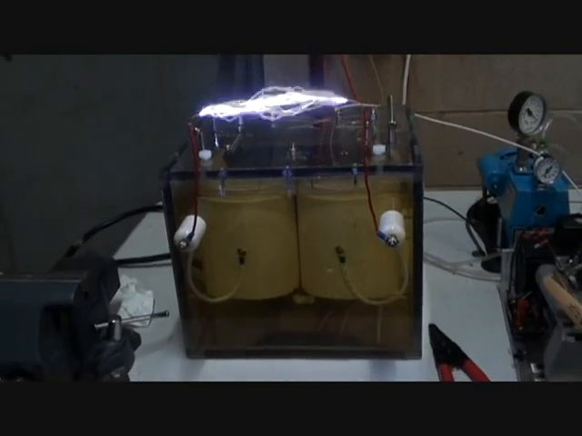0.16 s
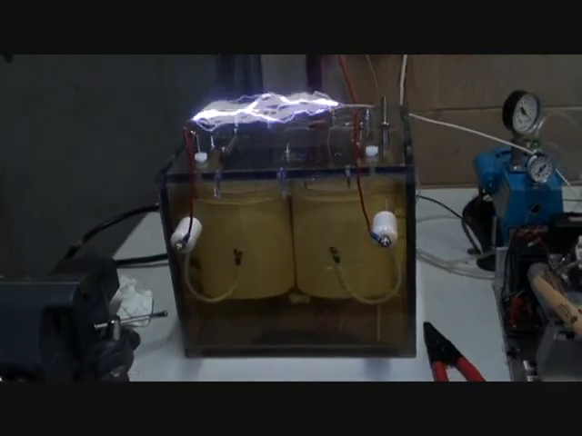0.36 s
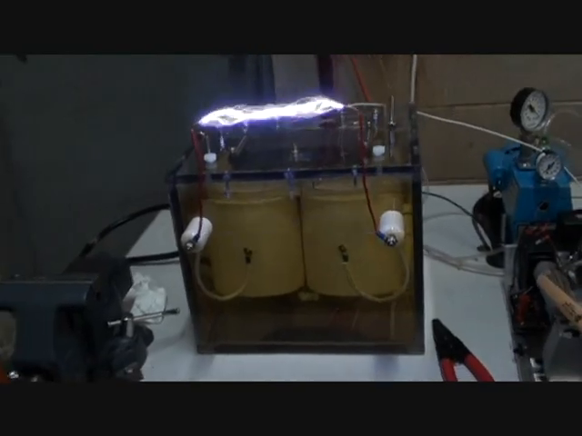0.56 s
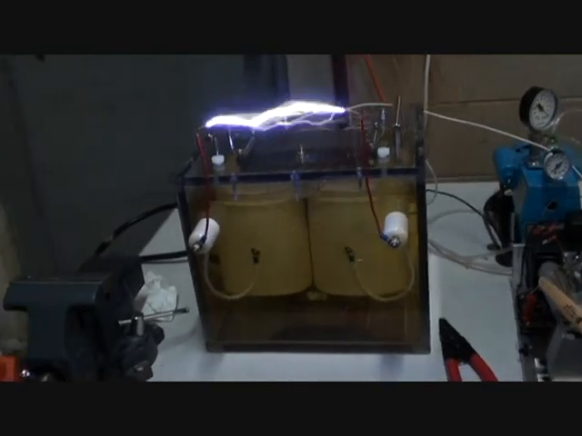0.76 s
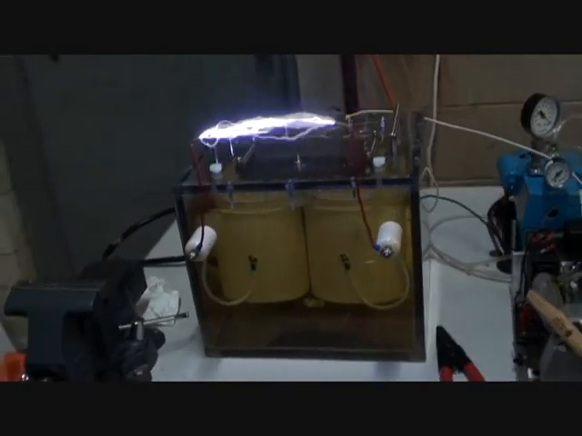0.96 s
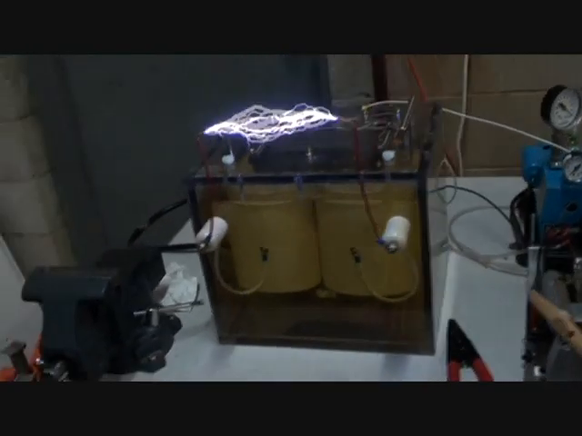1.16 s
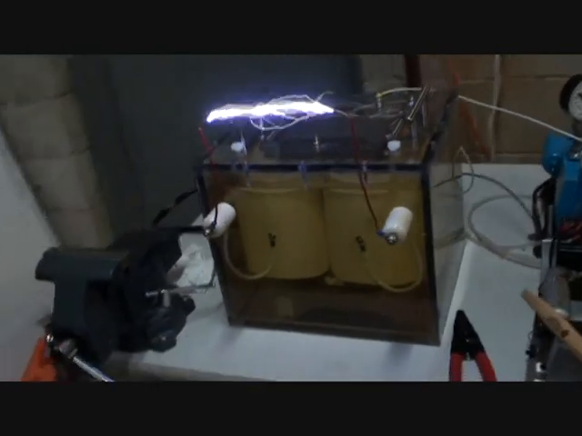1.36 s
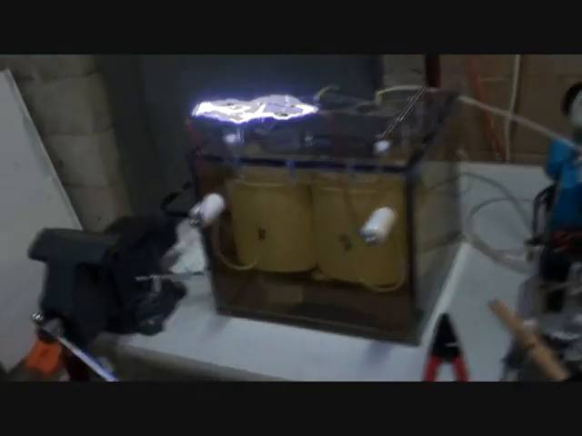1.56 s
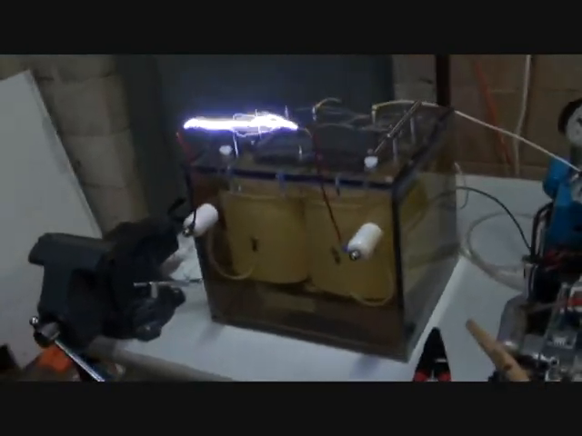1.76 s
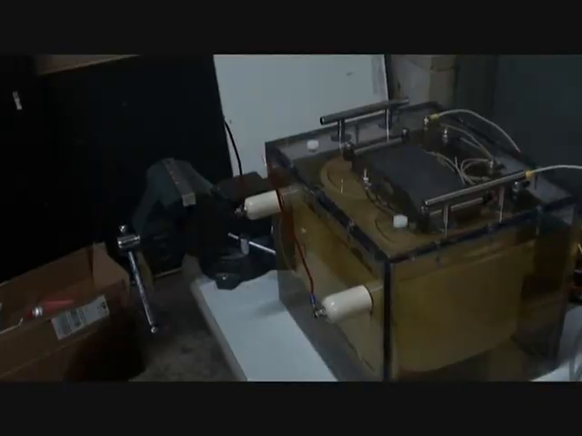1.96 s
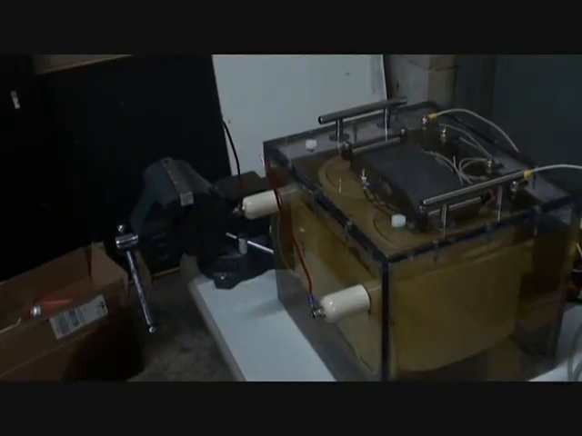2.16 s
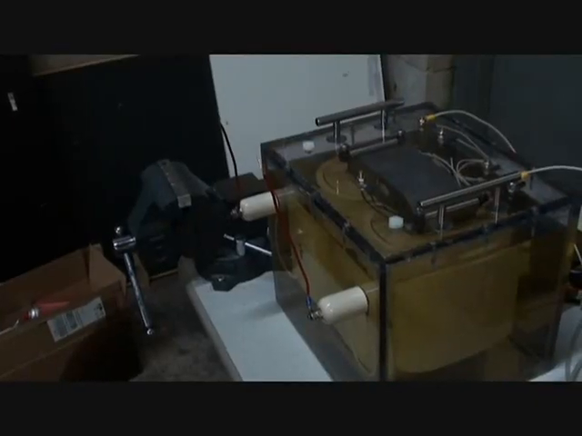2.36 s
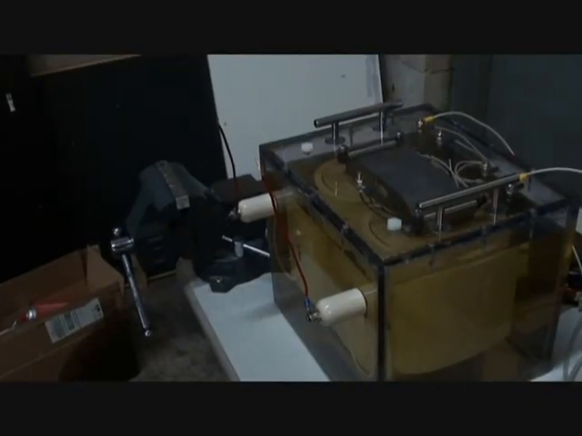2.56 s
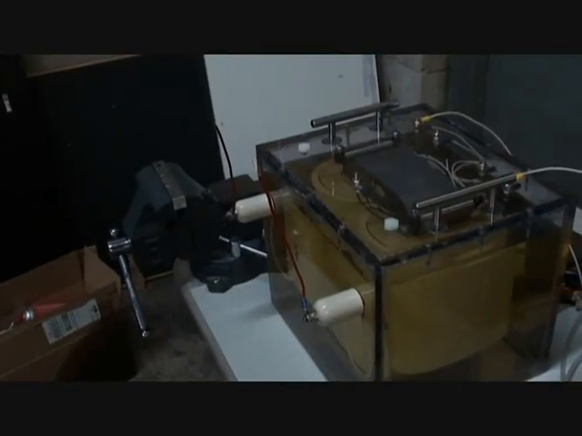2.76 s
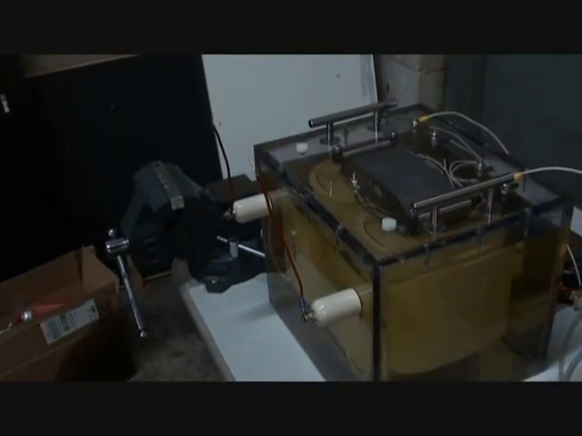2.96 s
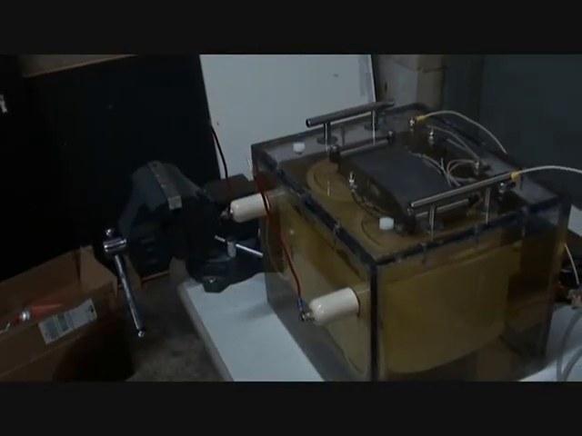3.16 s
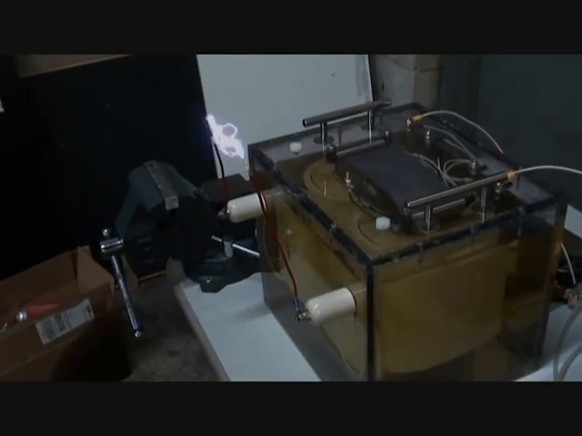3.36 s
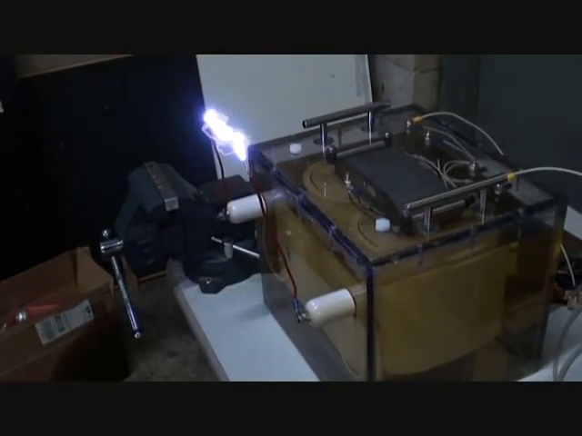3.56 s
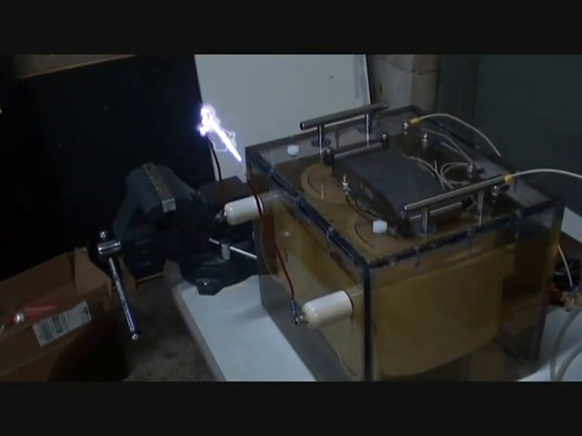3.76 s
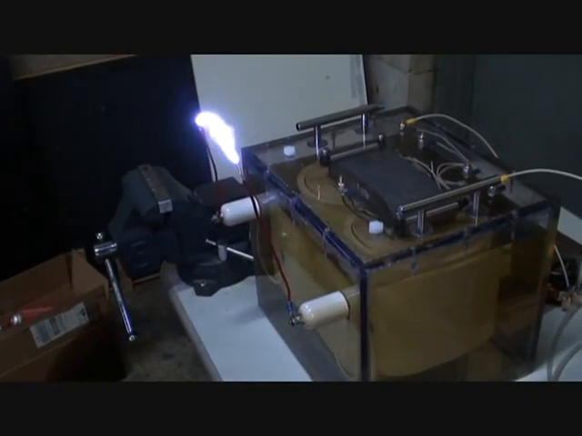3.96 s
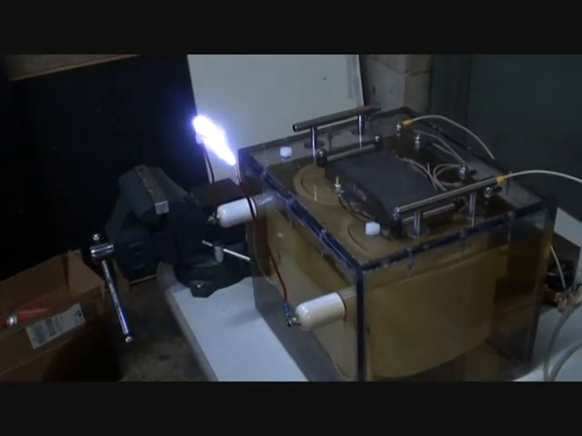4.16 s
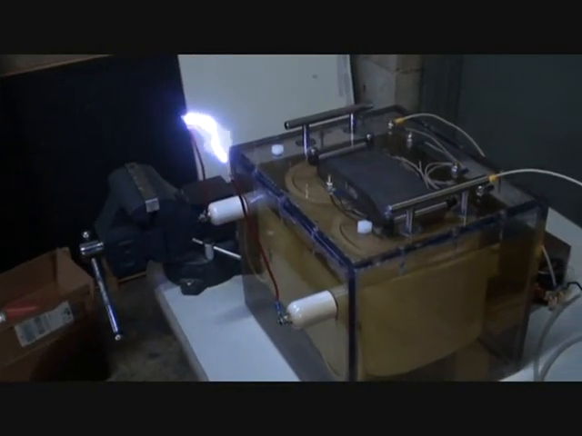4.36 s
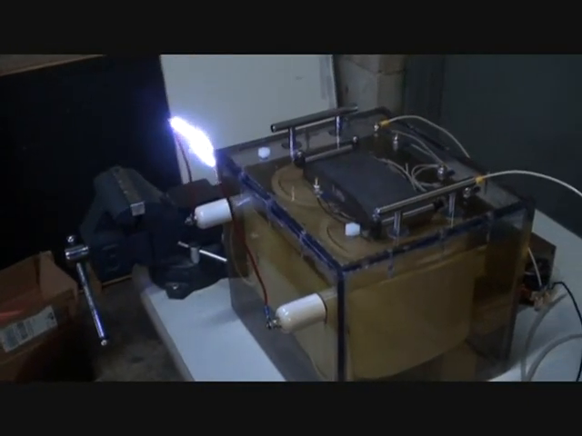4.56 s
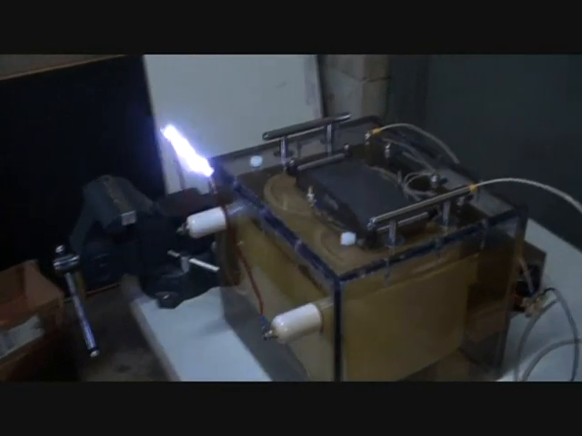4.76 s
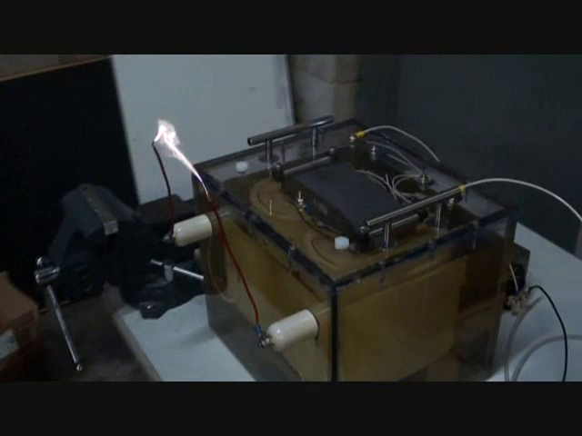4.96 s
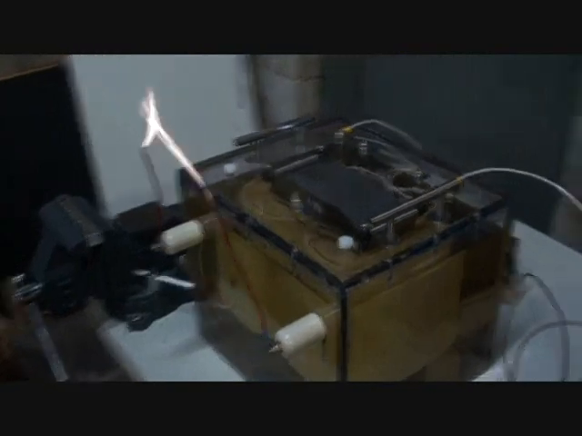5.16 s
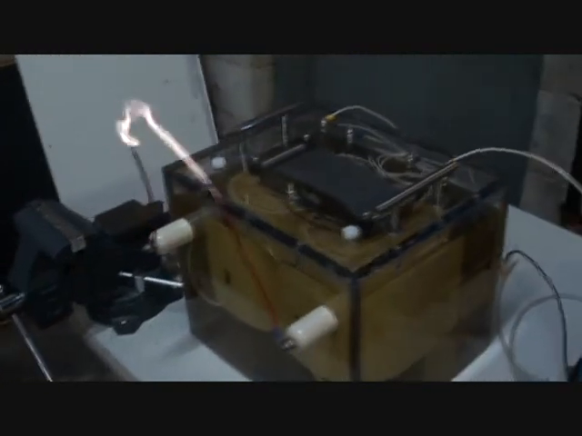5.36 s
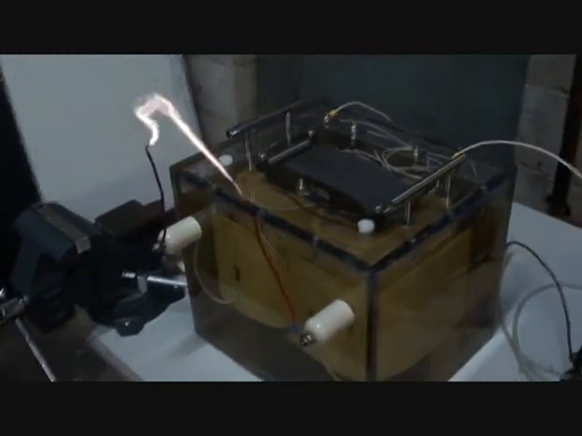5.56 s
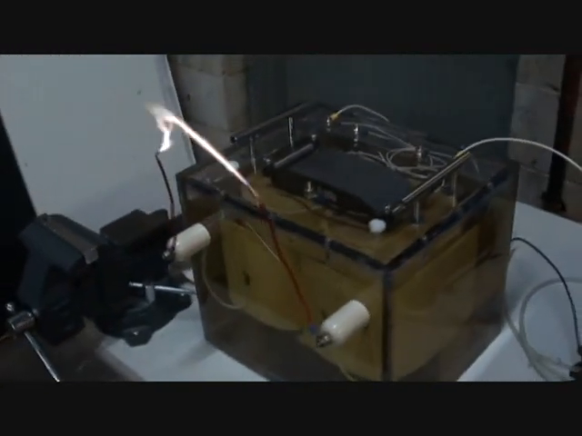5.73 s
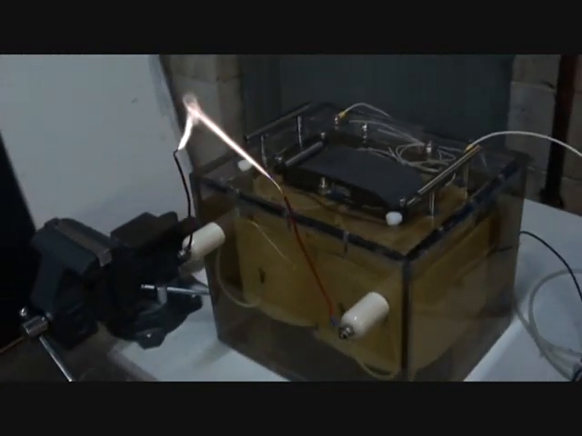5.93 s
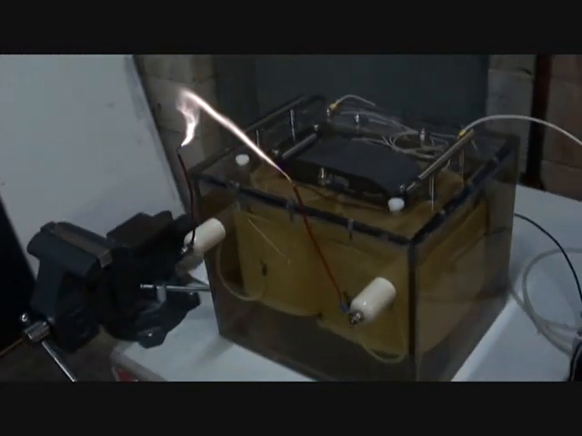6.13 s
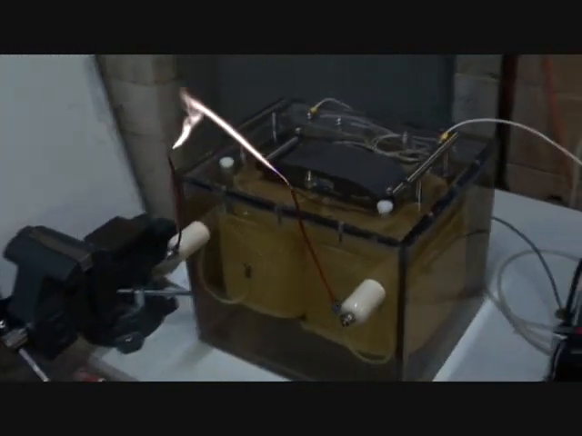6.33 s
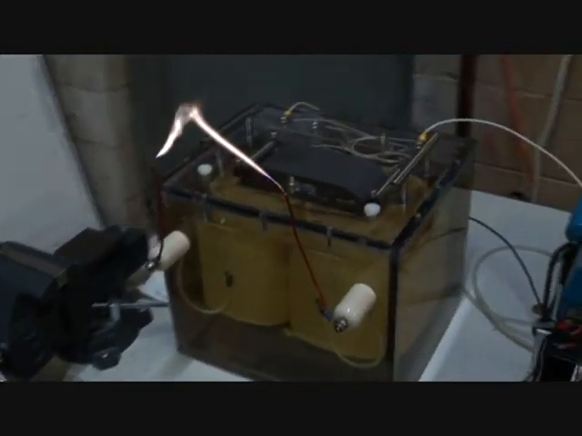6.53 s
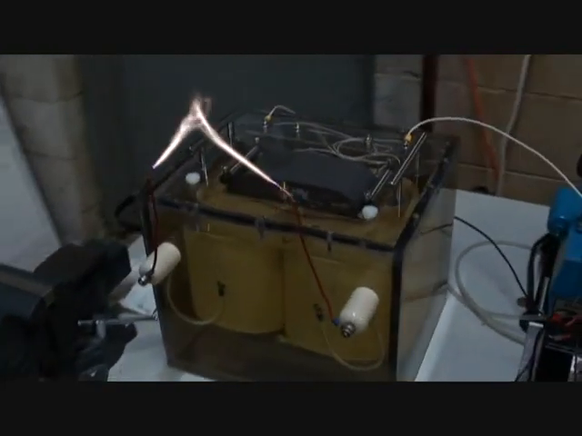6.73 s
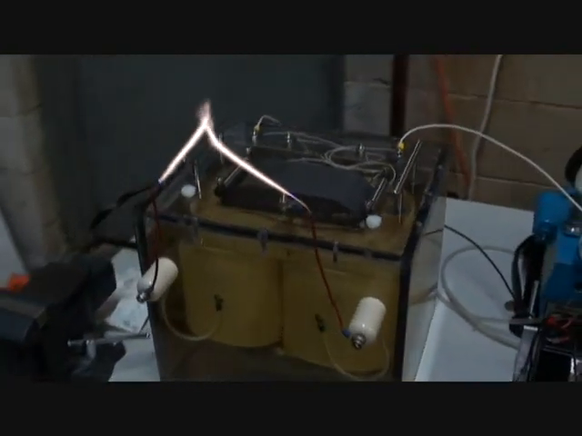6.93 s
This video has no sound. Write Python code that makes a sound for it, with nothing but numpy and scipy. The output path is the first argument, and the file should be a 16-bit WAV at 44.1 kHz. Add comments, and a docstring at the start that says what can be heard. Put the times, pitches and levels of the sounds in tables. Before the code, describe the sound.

High-voltage sparks crackle rapidly, give way briefly to hissing, then fire again and settle into a steadier humming, buzzing arc.

```python
"""First comes a loud, rasping crackle: rapid sparks jump a long gap at a humming high-voltage transformer
in a small workshop, with a few dull pops on the microphone. The sparks give way to the hiss of corona
(electricity leaking into the air), which grows as the voltage is turned up, until a short gap fires.
Its sparks merge into a buzzing, spitting arc, like a flame, that relights every half cycle of the
60 Hz mains, while the transformer hums more richly under the load."""
import sys
import numpy as np
from scipy import signal
from scipy.fft import rfft, irfft
from scipy.io import wavfile
from scipy.ndimage import uniform_filter1d

SR = 44100
rng = np.random.default_rng(int(sys.argv[2]) if len(sys.argv) > 2 else 0)


def digitize_waveform(pressure):
    """Quantize a signal to 16-bit integers and store it at the path in sys.argv[1].

    Rows of a 2-D input are taken as channels; values are limited to [-1, 1].
    """
    field = np.atleast_2d(pressure).T
    bounded = np.clip(field, -1, 1)
    quanta = np.round(bounded * 32767).astype(np.int16)
    wavfile.write(sys.argv[1], SR, quanta)


N = 312669
TIME = np.arange(N) / SR
MAINS_HZ = 60
PULSE_HZ = 2 * MAINS_HZ  # the voltage peaks twice per cycle
HALF_CYCLES = np.arange(-1, int(N / SR * PULSE_HZ) + 1)
# When each stage sounds: start_s, end_s
LONG_GAP_ON, CORONA_ON = (-.1, 1.913), (1.913, 3.488)
SHORT_GAP_ON, FLAME_ON = (3.488, 5.4), (4.99, 7.2)

# How each sound's strength is shared from bass to treble: pitch_hz, relative_db
LONG_GAP_TONE = [(120, -50), (400, -28.5), (700, -21), (1150, -13.5), (2000, -12.5), (3400, -12.5),
                 (4200, -8), (5600, -10), (6000, -4), (6500, -1), (8000, 0.5), (10000, -4), (12500, -7.5),
                 (15500, -16.5)]
ROOM_NOISE_TONE = [(20, -28), (70, -7), (160, 0.5), (400, 0.5), (1000, -7), (4000, -19.5), (15000, -53)]
CORONA_TONE = [(300, -29), (1500, -14.5), (3000, -15), (5500, -15), (6600, -7), (7800, -2), (9500, -2.5),
               (12000, -6.5), (15500, -14)]
RUMBLE_TONE = [(20, -26), (42, -10), (60, -3.5), (150, 0.5), (220, -5.5), (400, -6.5), (800, -9),
               (1300, -16.5), (2000, -26), (4000, -20.5)]
SHORT_GAP_TONE = [(150, -44), (500, -23.5), (800, -21), (1600, -16.5), (2100, -10.5), (2900, -7),
                  (4200, -8), (5900, -7.5), (6450, 0.5), (7600, 1), (9300, 0), (11500, -4.5), (13000, -9.5),
                  (15500, -11)]
BUZZ_TONE = [(200, -45), (550, -10.5), (780, 2), (1050, 4), (1400, 3), (2200, -24), (6000, -38)]
SHORT_FLAME_TONE = [(300, -30), (1000, -16.5), (1700, -7), (2100, -11), (3700, -3.5), (4500, -6.5),
                    (5600, -7), (6500, -3), (8000, -5), (10000, -7), (12000, -12), (15500, -23)]
LONG_FLAME_TONE = [(300, -19), (1050, -29), (1700, -17), (2700, -5), (4400, -16.5), (5500, -8), (6200, -10),
                   (8000, 1), (10000, -2.5), (12000, -5), (15500, -13.5)]
FLAME_CRACKLE_TONE = [(1000, -42), (4000, -4.5), (8000, 9), (11000, -12), (15500, -10)]

# Hum before the flame: multiple_of_120_hz, low_voltage_db, full_voltage_adds_db, long_gap_db, short_gap_db
IDLE_HUM = [(1, -50.5, 5, -50.5, -61), (2, -52.5, 10.5, -59, -63)]
# Hum under the flame's load: multiple_of_120_hz, relative_db
LOADED_HUM = [(0.5, -21), (1, -1.5), (1.5, -15), (2, 2.5), (2.5, -17), (3, -5.5), (3.5, -8), (4, -6),
              (4.5, -20.5), (5, -4), (5.5, -15.5), (6, -9), (6.5, -19), (7, -14), (7.5, -24), (8, -23)]
# Stirred air and room rumble: time_s, level_db
ROOM_NOISE_LEVEL = [(0, -44), (.8, -45.5), (1.3, -51), (3.5, -56.5), (4.2, -59), (7.09, -63.5)]
# Pops on the microphone: start_s, relative_db
POPS = [(0.211, -16.5), (0.2587, -23), (0.309, -15), (0.3181, -10), (0.3427, -17), (0.4273, -15.5),
        (0.461, -22), (0.6266, -14.5), (0.646, -23), (0.692, -24), (0.7278, -21.5), (1.091, -23.5)]
# Lone sparks, the last one firing the short gap: start_s, relative_db
STRAY_SPARKS = [(3.0716, -18), (3.105, -27), (3.205, -29), (3.2715, -19), (3.2869, -22), (3.488, -9)]
# How far the flame is drawn out: time_s, length (0 short and sputtering, 1 long with one sharp snap)
FLAME_LENGTH = [(5.4, 0.025), (6.15, 0.18), (6.35, 0.49), (7.09, 0.69)]
# Spits of the flame: start_s, relative_db, pitch_hz, length_s
SPITS = [(5.052, -28.5, 4960, 0.056), (5.466, -36, 5050, 0.03), (5.497, -35, 4240, 0.03),
         (5.545, -34, 4250, 0.03), (5.582, -39, 4260, 0.026), (5.682, -35, 4910, 0.044),
         (5.734, -32, 4230, 0.018), (5.985, -35, 5210, 0.065), (6.084, -39, 4700, 0.033),
         (6.128, -30, 4330, 0.03), (6.248, -30.5, 5040, 0.03), (6.285, -30, 4640, 0.035),
         (6.482, -36, 5000, 0.028), (6.55, -31, 5000, 0.03), (6.752, -33, 4800, 0.022),
         (6.825, -31, 4770, 0.025), (7.036, -36, 4600, 0.023)]

# How long the room's echoes take to fade by 60 dB: pitch_hz, fade_s
ECHO_FADE = [(200, 0.33), (2000, 0.46), (8000, 0.11), (16000, 0.037)]
# How much sound the walls send back: pitch_hz, gain_db
ECHO_TONE = [(1000, 0), (8000, 0.5), (11000, -6.5), (16000, 0)]
# Strength of the echoes that make left and right differ: pitch_hz, gain_db
SPARK_WIDTH = [(80, -28), (250, -8), (550, -4.5), (1000, -6.5), (2000, -27), (4000, -19.5), (5700, -16),
               (8000, -17.5), (10500, -28), (15000, -78)]
CORONA_WIDTH = [(80, -50), (450, -17), (900, -10.5), (1600, -9.5), (2300, -31), (4000, -45), (5500, -13),
                (8000, -14), (10500, -38)]
FLAME_WIDTH = [(170, -43), (400, -47), (900, -32), (1300, -38), (2700, -39), (4300, -17), (5300, -11.5),
               (8000, -15), (11000, -26), (15000, -28)]


def amp(db):
    """Turns decibels into a multiplier."""
    return 10 ** (np.asarray(db) / 20)


def unit(x):
    """Scales a sound to an average strength (rms) of 1."""
    return x / np.sqrt(np.mean(x ** 2) + 1e-20)


def curve(rows, t=TIME):
    """Joins a table's points with straight lines in time."""
    return np.interp(t, *np.transpose(rows))


def spectrum(points, hz):
    """Reads a table by pitch, with octaves evenly spaced."""
    pitches, values = np.transpose(points)
    return np.interp(np.log(hz + 1), np.log(pitches), values)


def during(span):
    """1 inside the time span, 0 outside."""
    return (TIME >= span[0]) * (TIME < span[1])


def since(start_s):
    """Seconds gone by since a moment, 0 before it."""
    return np.maximum(TIME - start_s, 0)


def drift(per_s, count=12):
    """A slow random wander of strength 1."""
    rates, phases = per_s * rng.uniform(.3, 1.5, count), rng.random(count)
    t = TIME[::64]
    waves = np.sin(2 * np.pi * (rates * t[:, None] + phases))
    return np.interp(TIME, t, unit(waves.sum(1)))


def colour(x, tone, size=4096):
    """Gives a sound a tone and a strength of 1, keeping the sharp start of each click."""
    log_gain = np.log(amp(spectrum(tone, abs(np.fft.fftfreq(size, 1 / SR)))))
    taps = np.fft.ifft(np.exp(np.conj(signal.hilbert(log_gain)))).real
    return unit(signal.oaconvolve(x, taps[:size // 2])[:N])


def clicks(half_cycles, sizes, reach=8):
    """Clicks at exact moments, even between samples, counted in half cycles of the mains."""
    at = np.ravel(half_cycles) * SR / PULSE_HZ
    index = np.floor(at).astype(int)[:, None] + np.arange(1 - reach, reach + 1)
    offset = index - at[:, None]
    shape = np.ravel(sizes)[:, None] * np.sinc(offset) * np.sinc(offset / reach)
    inside = (index >= 0) & (index < N)
    return np.bincount(index[inside], shape[inside], N)


def echoes(x, size=16000, spacing=8):
    """The workshop sends back many small echoes; the treble dies first."""
    taps = np.zeros(size)
    at = np.arange(3 * spacing, size - spacing, spacing)
    taps[at + rng.integers(0, spacing, len(at))] = rng.choice([-1., 1.], len(at))
    hz, t, bands = signal.stft(taps, SR, nperseg=256)
    nearby = 1 + 4.8 * np.exp(-t / 0.0041)  # the transformer's tank and the bench answer first
    fade = amp(-60 * t / spectrum(ECHO_FADE, hz)[:, None])
    tail = rfft(signal.istft(bands * nearby * fade, SR, nperseg=256)[1][:size])
    tail /= np.sqrt(uniform_filter1d(abs(tail) ** 2, size=70))  # a cluttered room favours no pitch
    tail *= amp(spectrum(ECHO_TONE, np.fft.rfftfreq(size, 1 / SR)))
    return signal.oaconvolve(x, irfft(tail)[:size // 2])[:N]


def in_room(x, echo_db, moves_per_s, patterns=4):
    """Adds echoes whose pattern shifts as the electric path and the microphone move."""
    turn = TIME * moves_per_s
    away = abs((turn - np.arange(patterns)[:, None] + patterns / 2) % patterns - patterns / 2)
    blends = np.cos(np.pi / 2 * np.minimum(away, 1))
    reflected = sum(echoes(x * amp(echo_db) * blend) for blend in blends)
    return (x + reflected) / np.sqrt(1 + amp(echo_db) ** 2)


def widen(mid, width, size=327680):
    """Left and right hear almost the same; echoes set them slightly apart."""
    gain = amp(spectrum(width, np.fft.rfftfreq(size, 1 / SR)))
    side = irfft(rfft(echoes(mid), size) * gain)[:N]
    return np.array([mid + side, mid - side])


def voltage(middle_s=2.64, ease_s=0.12):
    """The supply is turned up in one smooth move: 0 low, 1 full."""
    return .5 + .5 * np.tanh((TIME - middle_s) / (2 * ease_s))


def spark_train(sparks, start, busy, bunching, jitter, wander, spread_db, flutter_db, crooked):
    """A gap recharges and sparks many times each half cycle, fastest when the current peaks."""
    waits, sizes = rng.standard_normal((2, len(HALF_CYCLES), 32))
    late, pace, strength = rng.standard_normal((3, len(HALF_CYCLES), 1))
    waits = np.exp(jitter * waits + .1 * pace)
    charge = (np.cumsum(waits, 1) - waits[:, :1]) / sparks
    bunched = np.arccos(1 - 2 * np.minimum(charge, 1)) / np.pi
    # start, wander and busy are fractions of a half cycle
    phase = start + wander * late + busy * (bunching * bunched + (1 - bunching) * charge)
    fired = charge < 1
    at = (HALF_CYCLES[:, None] + phase)[fired]
    loudness = amp(spread_db * sizes + flutter_db * strength)[fired]
    # every spark takes a new crooked path, whose far bends are heard a little later
    lags = rng.uniform(0.0052, 0.0494, (3, *fired.shape))[:, fired]
    bends = rng.standard_normal((3, *fired.shape))[:, fired]
    return clicks(at, loudness) + clicks(at + lags, crooked * bends * loudness)


def long_gap(start_db=-13.5, sag_db_per_s=1.0, surge_db=0.4):
    """Orderly bursts of sparks weaken as the air warms and surge as their path wanders."""
    train = spark_train(sparks=13.5, start=.555, busy=.88, bunching=0.445, jitter=.2,
                        wander=0.01397, spread_db=2.0, flutter_db=0.94, crooked=0.38)
    level_db = start_db - sag_db_per_s * TIME + surge_db * drift(per_s=5.4)
    cracks = colour(train, LONG_GAP_TONE) * amp(level_db) * during(LONG_GAP_ON)
    return in_room(cracks, echo_db=-6.5, moves_per_s=8.99, patterns=7)


def core_hum(tones):
    """The transformer's vibrating core gives steady, pure tones."""
    return unit(sum(amp(db) * np.sin(2 * np.pi * (multiple * PULSE_HZ * TIME + rng.random()))
                    for multiple, db in tones))


def transformer(sag_db_per_s=8, load_s=4.93, attack_s=0.08, loaded_db=-45, creep_db=5, creep_s=0.59):
    """The hum follows the voltage, sinks while a gap fires and swells under the flame's heavy current."""
    long_on, short_on = (during(span) * amp(-sag_db_per_s * since(span[0]))
                         for span in (LONG_GAP_ON, SHORT_GAP_ON))
    idle = np.zeros(N)
    for multiple, low_db, rise_db, long_db, short_db in IDLE_HUM:
        under_corona = amp(low_db + rise_db * voltage()) * during(CORONA_ON)
        under_sparks = amp(long_db) * long_on + amp(short_db) * short_on
        idle += (under_corona + under_sparks) * core_hum([(multiple, 0)])
    fade_in = np.minimum(since(load_s) / attack_s, 1)
    level = amp(loaded_db - creep_db * np.exp(-since(load_s) / creep_s))
    return idle + core_hum(LOADED_HUM) * fade_in * level


def room_noise():
    """Stirred air and room rumble slowly die down."""
    return amp(curve(ROOM_NOISE_LEVEL)) * colour(rng.standard_normal(N), ROOM_NOISE_TONE)


def microphone_pops(gain_db=4, push_s=0.00076, cutoff_hz=750):
    """Each dull pop is one quick push of air and a slower pull back."""
    pops = np.zeros(N)
    for start_s, db in POPS:
        age = since(start_s) / push_s
        pops += amp(db + gain_db) * (TIME >= start_s) * (1 - age) * np.exp(-age)
    return signal.lfilter(*signal.butter(2, cutoff_hz, fs=SR), pops)


def corona(streamers_per_s=7000, lopsided_db=0.9, flicker_db=0.9, hiss_db=-32.5, rumble_db=-36):
    """Streamers, tiny threads of glowing air, hiss around each voltage peak and stir up a rumble."""
    turns = TIME * PULSE_HZ
    half = turns.astype(int)
    from_peak = abs(turns % 1 - .5)
    glow_share = 0.52 + 0.15 * voltage()  # the part of each half cycle that glows
    glow = 1 / (1 + np.exp((from_peak - glow_share / 2) / 0.082))
    flicker = rng.standard_normal(half[-1] + 1)[half]
    strength = amp(lopsided_db * (-1) ** half - flicker_db * flicker)
    streamers = rng.standard_normal(N) * (rng.random(N) < streamers_per_s / SR)
    hiss = colour(streamers * glow * strength, CORONA_TONE) * amp(hiss_db + 4.5 * voltage())
    push = amp(-9) * np.sin(np.pi * turns)  # one direction of the voltage blows harder than the other
    air = colour(rng.standard_normal(N) * (4.0 + glow), RUMBLE_TONE)
    rumble = (air + push) * amp(rumble_db + 0.5 * voltage())
    on = during(CORONA_ON)
    return in_room(hiss * on, echo_db=-5, moves_per_s=6.04) + rumble * on


def corona_crackle(level_db=-41, scatter=0.12, spread_db=10.0):
    """With the voltage turned up, a longer streamer snaps near each peak."""
    late, size = rng.standard_normal((2, len(HALF_CYCLES)))
    snaps = clicks(HALF_CYCLES + 0.5 + scatter * late, amp(spread_db * np.minimum(size, 2)))
    crackle = colour(snaps, SHORT_GAP_TONE) * amp(level_db) * voltage() * during(CORONA_ON)
    return in_room(crackle, echo_db=-7, moves_per_s=3)


def stray_sparks(gain_db=7):
    """Lone cracks break through when the voltage is almost enough to fire the gap."""
    start_s, db = np.transpose(STRAY_SPARKS)
    cracks = colour(clicks(start_s * PULSE_HZ, amp(db)), SHORT_GAP_TONE)
    cracks *= amp(db.max() + gain_db) / abs(cracks).max()
    return cracks + amp(-2) * echoes(cracks)


def short_gap(level_db=-18, merge_s=4.923, merge_db_per_s=76, buzz_db=-43.5, buzz_fade_db_per_s=4.5):
    """Looser sparks fill the whole cycle over a buzz, then die away as they merge into the flame."""
    train = spark_train(sparks=12.5, start=0.163, busy=0.99, bunching=0.272, jitter=.45,
                        wander=.08, spread_db=2.0, flutter_db=-0.6, crooked=0.35)
    firing = during(SHORT_GAP_ON) * amp(-merge_db_per_s * since(merge_s))
    cracks = colour(train, SHORT_GAP_TONE) * amp(level_db)
    late, size = rng.standard_normal((2, len(HALF_CYCLES)))
    direction = (-1.) ** HALF_CYCLES  # the buzz flips with the voltage
    strokes = clicks(HALF_CYCLES + 0.606 + 0.0098 * late, direction * amp(2.4 * size))
    buzz = colour(strokes, BUZZ_TONE) * amp(buzz_db - buzz_fade_db_per_s * since(SHORT_GAP_ON[0]))
    return in_room(cracks * firing, echo_db=-3.0, moves_per_s=12, patterns=9) + buzz * firing


def flame_swish(x, lag_s=0.000408, sway=0.28, share=0.12):
    """The swaying flame's two legs are heard with shifting delays, which makes it swish."""
    delays = [lag_s * np.exp(sway * drift(per_s=3.8)) for _ in range(2)]
    legs = sum(np.interp(TIME - delay, TIME, x) for delay in delays)
    return unit(x + share * legs)


def flame(short_db=-37.5, stretch_db=18, flare_db=-11.5, sputter_db=-8, crackle_db=-11):
    """The hot arc relights with a snap each half cycle, louder and steadier as it is drawn out."""
    length = curve(FLAME_LENGTH, HALF_CYCLES / PULSE_HZ)
    late, size, second_late, second_size, sharpness = rng.standard_normal((5, len(HALF_CYCLES)))
    unrest = 1 - 0.57 * length
    relight_at = HALF_CYCLES + .193 + 0.0031 * unrest * late
    snaps = clicks(relight_at, amp(0.92 * unrest * size))
    # a weaker snap follows, fading as the flame lengthens
    second_at = HALF_CYCLES + .87 + 0.0651 * length + 0.0074 * second_late
    snaps += clicks(second_at, amp(-2.5 - 10.5 * length + second_size))
    # now and then the arc relights abruptly and adds a bright crackle
    abrupt = clicks(relight_at, amp(5 * unrest * np.minimum(sharpness, 2)))
    crackle = amp(crackle_db) * colour(abrupt, FLAME_CRACKLE_TONE)
    fizz = unit(rng.standard_normal(N) * (1.0 + np.cos(2 * np.pi * (TIME * PULSE_HZ - .4))))
    short_flame = colour(unit(snaps) + amp(sputter_db) * fizz, SHORT_FLAME_TONE)
    long_flame = colour(snaps, LONG_FLAME_TONE)
    stretch = curve(FLAME_LENGTH)
    arc = flame_swish((1 - stretch) * short_flame + stretch * long_flame + crackle)
    # each spit briefly swells the flame
    flares = sum(amp(db) * (TIME >= start_s) * np.exp(-(since(start_s) / length_s) ** 2)
                 for start_s, db, _, length_s in SPITS)
    level = amp(short_db + stretch_db * stretch) + amp(flare_db) * flares
    return in_room(arc * level * during(FLAME_ON), echo_db=1.0 - 13.6 * stretch, moves_per_s=3.007)


def flame_spits(gain_db=-8, upper_hz=8200, upper_db=5, size=6000):
    """The flame flares for a few half cycles, trailing a short fizz each time it relights."""
    spits = np.zeros(N + size)
    age = np.arange(size) / SR
    for start_s, db, pitch_hz, length_s in SPITS:
        since_relight = ((start_s + age) * PULSE_HZ - .19) % 1
        fizz = rng.standard_normal(size) * (0.087 + np.exp(-since_relight / 0.074))
        bands_hz = [pitch_hz - 400, pitch_hz + 400], [upper_hz - 1800, upper_hz + 1800]
        low, high = (unit(signal.lfilter(*signal.butter(1, band, "band", fs=SR), fizz))
                     for band in bands_hz)
        level = amp(db + gain_db) * np.exp(-(age / length_s) ** 2)
        spits[round(start_s * SR):][:size] += level * (low + amp(upper_db) * high)
    bright = signal.lfilter(*signal.butter(2, [3600, 11500], "band", fs=SR), spits[:N])
    return bright + amp(-13) * echoes(bright)


def scene():
    """Long sparks, corona, short sparks and flame follow one another over hum and room noise."""
    air = room_noise()
    sparks = widen(long_gap() + stray_sparks() + short_gap(), SPARK_WIDTH)
    glow = widen(corona() + corona_crackle(), CORONA_WIDTH)
    flame_and_hum = widen(flame() + flame_spits() + transformer(), FLAME_WIDTH)
    return sparks + glow + flame_and_hum + microphone_pops() + widen(air, SPARK_WIDTH)


def record(dry):
    """Rounds off the loudest cracks and removes the very highest treble."""
    ceiling, cutoff_hz = .55, 15850
    rounded = dry / (1 + (dry / ceiling) ** 6) ** (1 / 6)
    treble_cut = signal.firwin(511, cutoff_hz, window=("kaiser", 9), fs=SR)
    return signal.oaconvolve(rounded, treble_cut[None], "same")


dry = scene()
out = record(dry)
digitize_waveform(out)
```